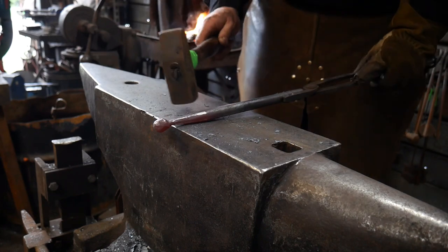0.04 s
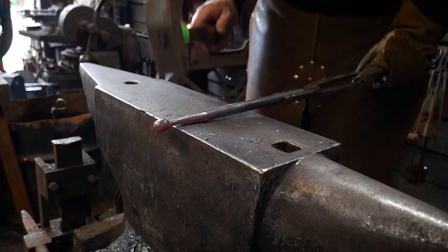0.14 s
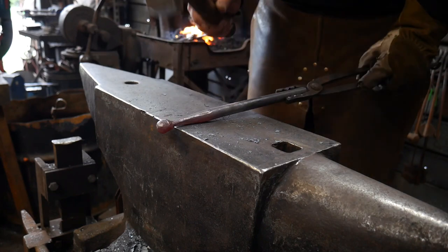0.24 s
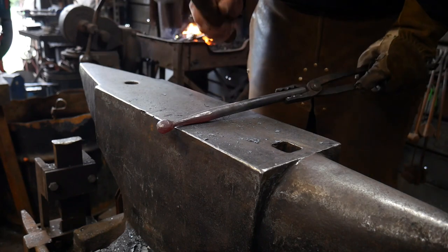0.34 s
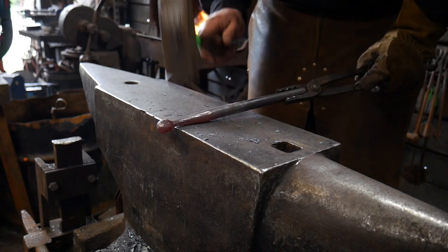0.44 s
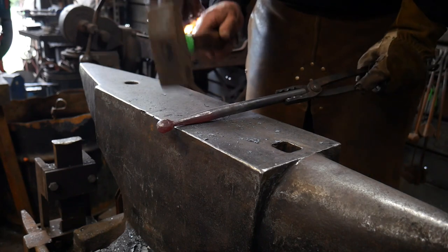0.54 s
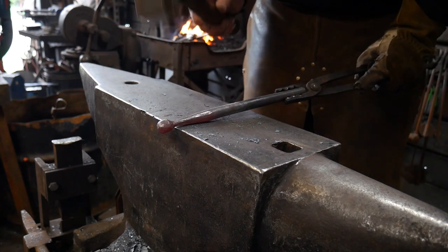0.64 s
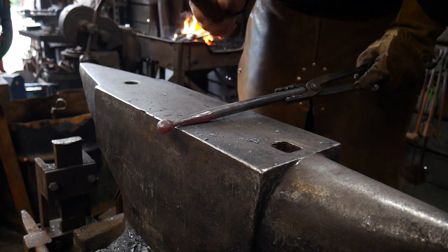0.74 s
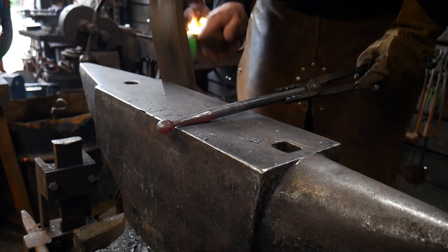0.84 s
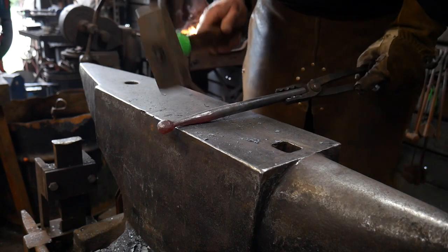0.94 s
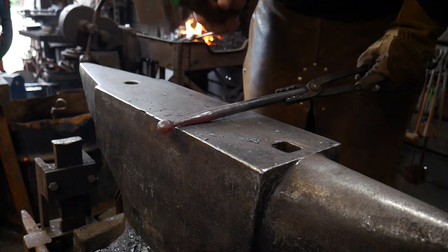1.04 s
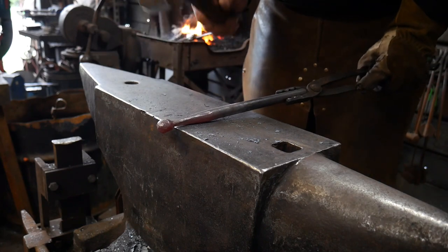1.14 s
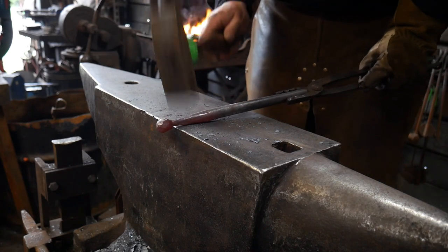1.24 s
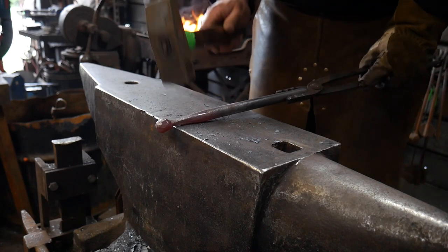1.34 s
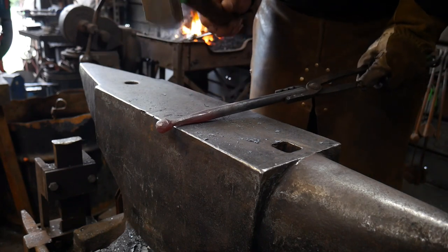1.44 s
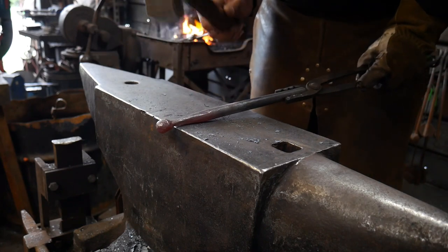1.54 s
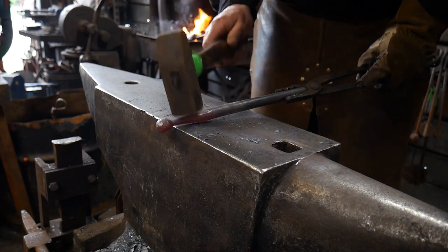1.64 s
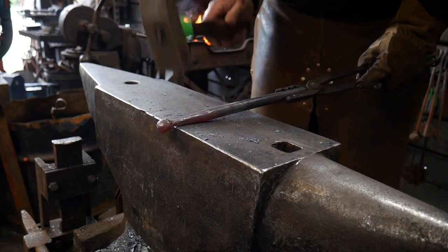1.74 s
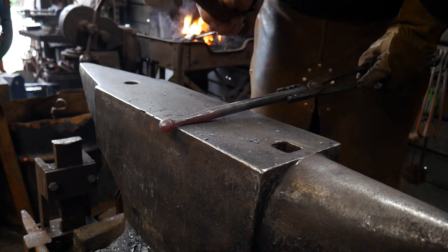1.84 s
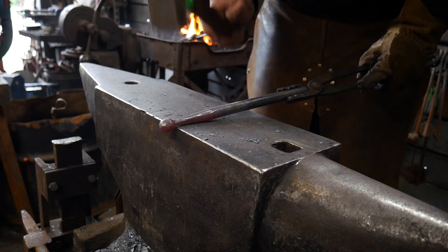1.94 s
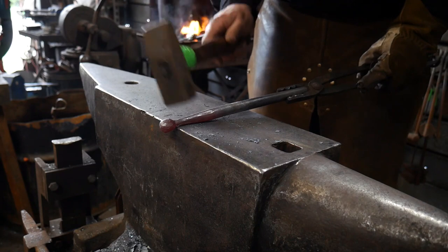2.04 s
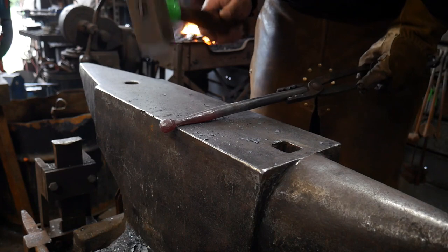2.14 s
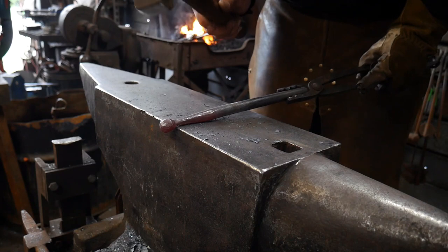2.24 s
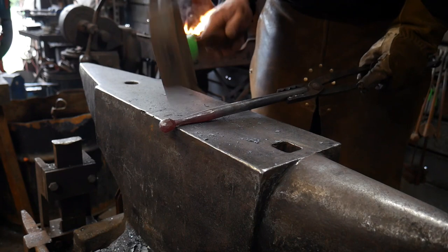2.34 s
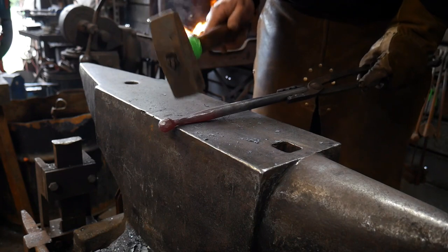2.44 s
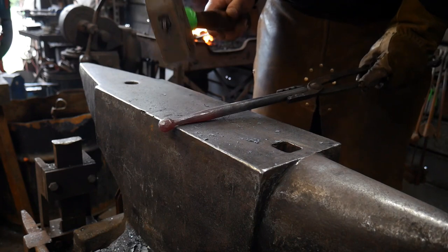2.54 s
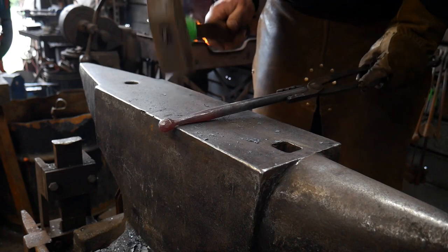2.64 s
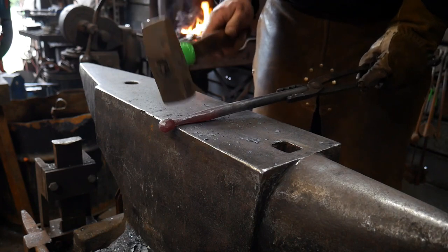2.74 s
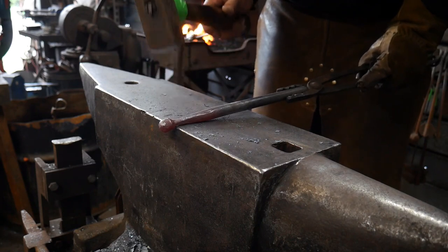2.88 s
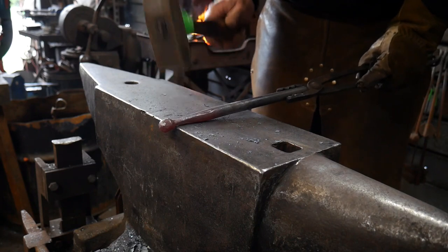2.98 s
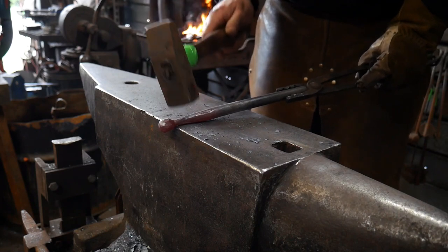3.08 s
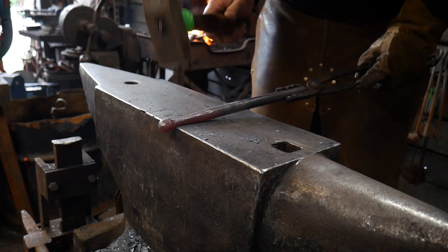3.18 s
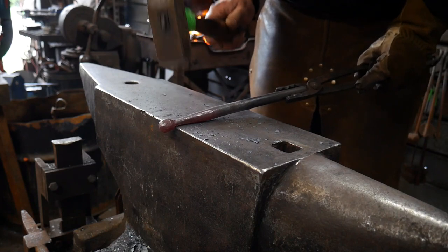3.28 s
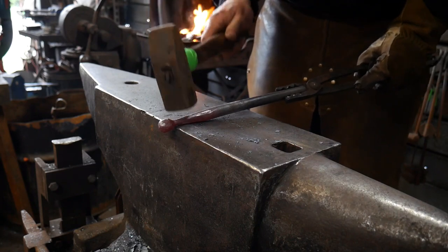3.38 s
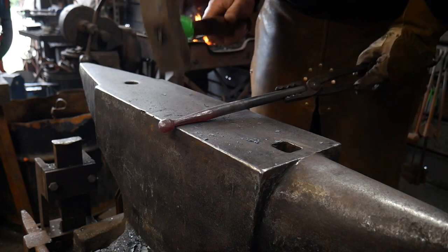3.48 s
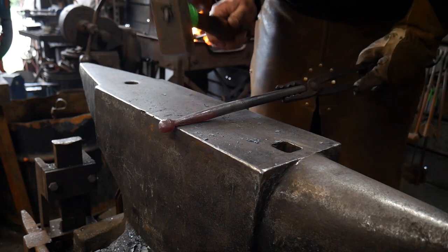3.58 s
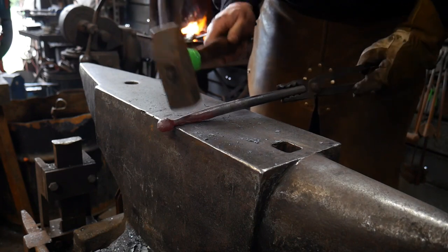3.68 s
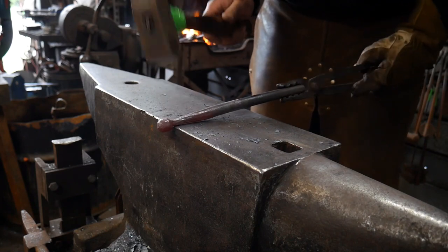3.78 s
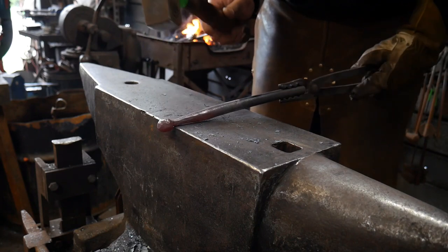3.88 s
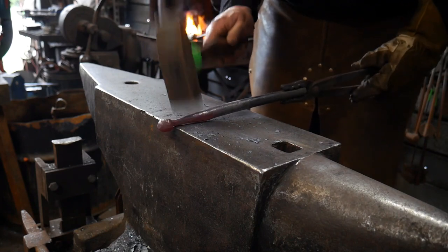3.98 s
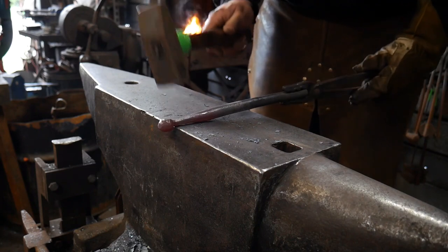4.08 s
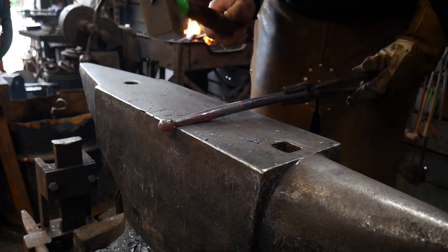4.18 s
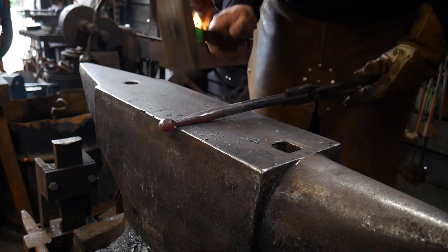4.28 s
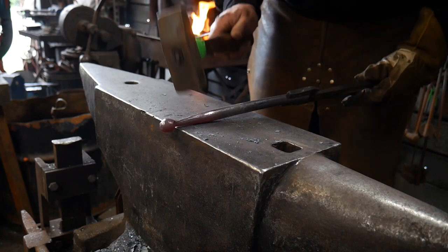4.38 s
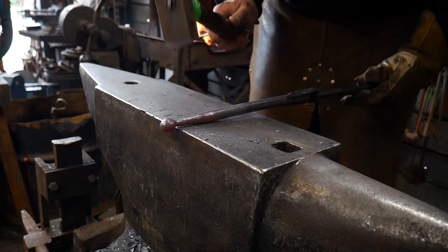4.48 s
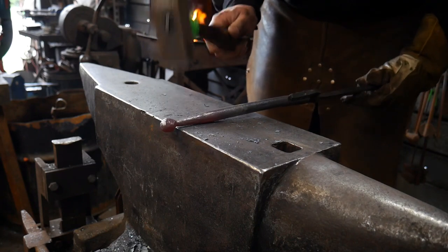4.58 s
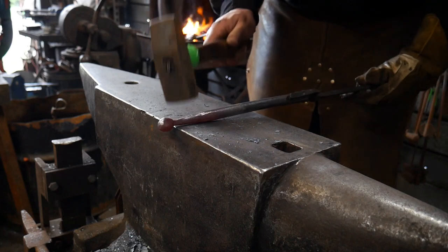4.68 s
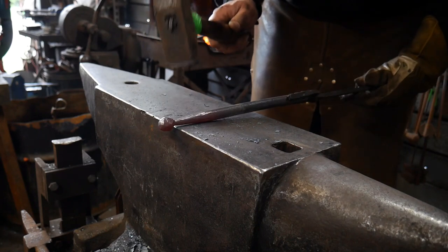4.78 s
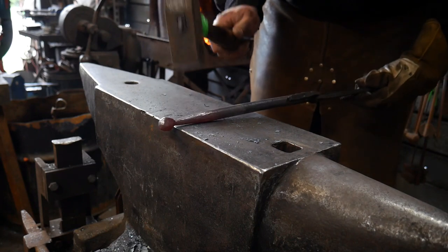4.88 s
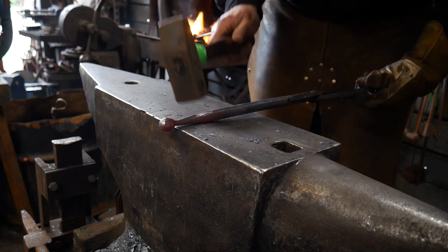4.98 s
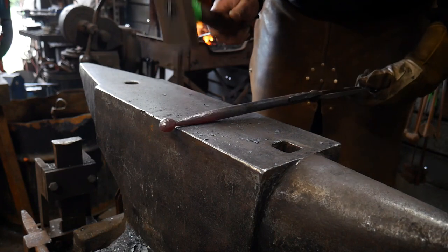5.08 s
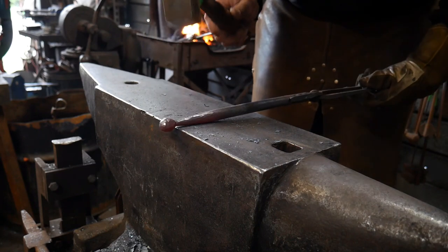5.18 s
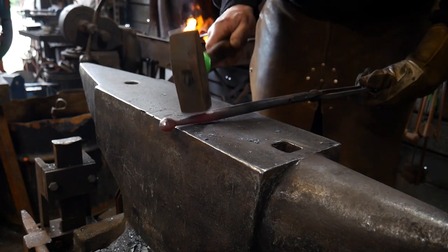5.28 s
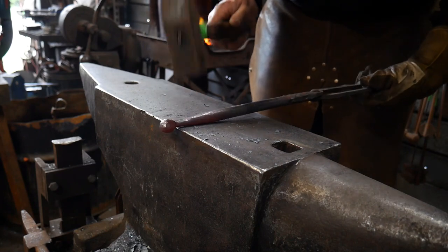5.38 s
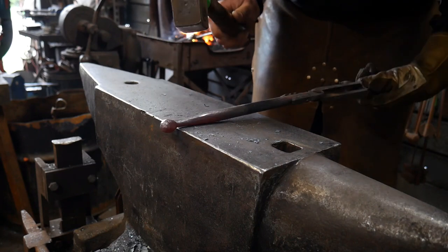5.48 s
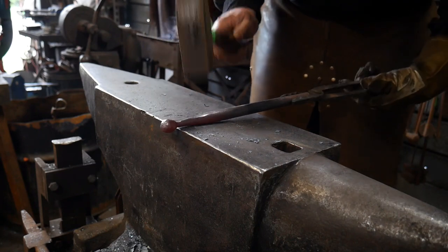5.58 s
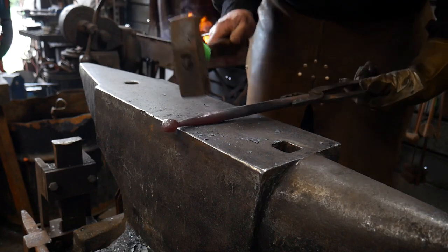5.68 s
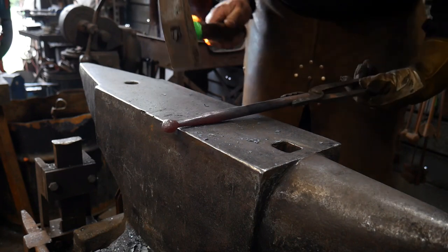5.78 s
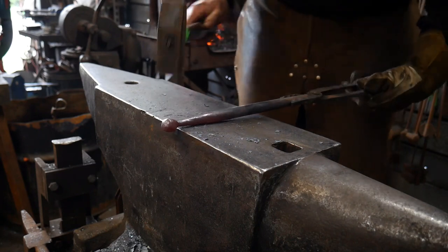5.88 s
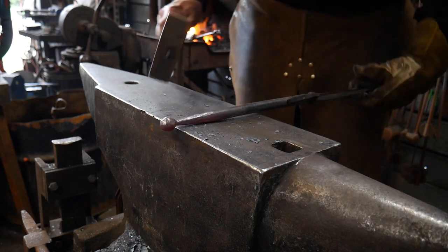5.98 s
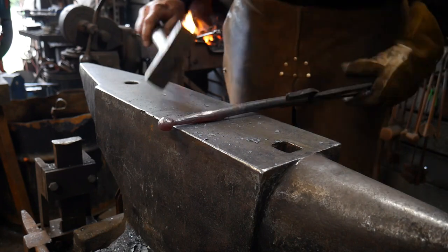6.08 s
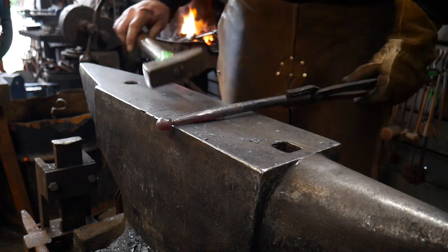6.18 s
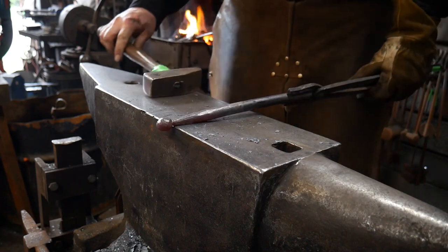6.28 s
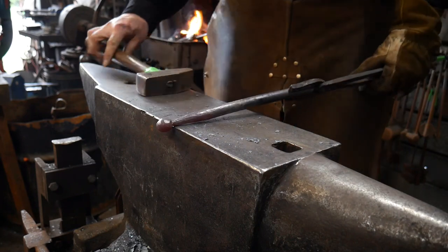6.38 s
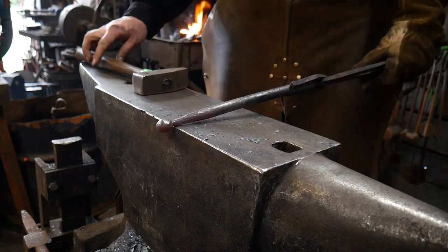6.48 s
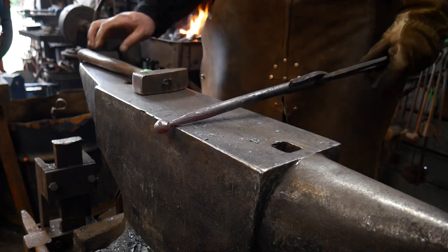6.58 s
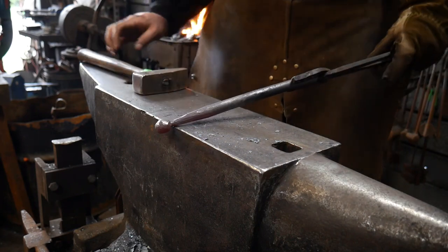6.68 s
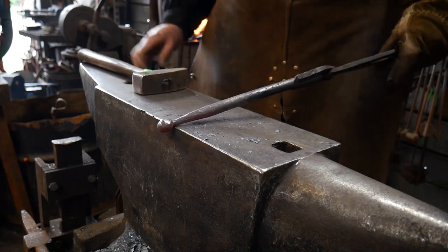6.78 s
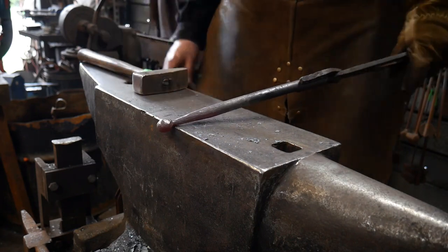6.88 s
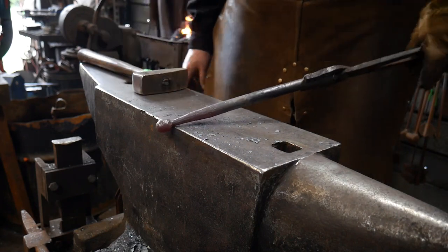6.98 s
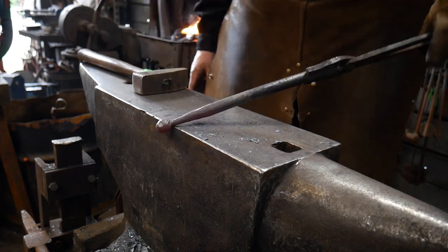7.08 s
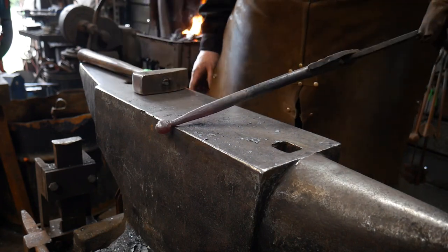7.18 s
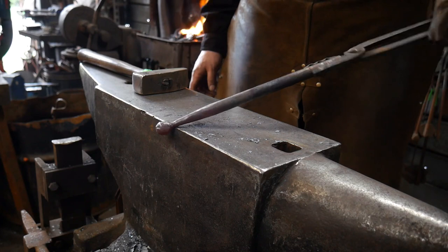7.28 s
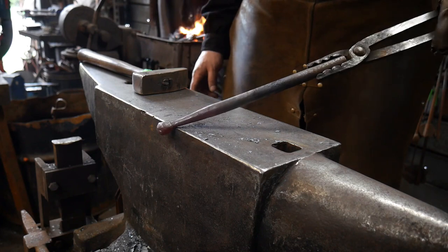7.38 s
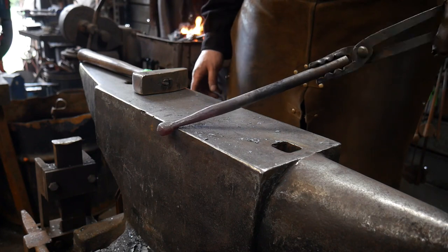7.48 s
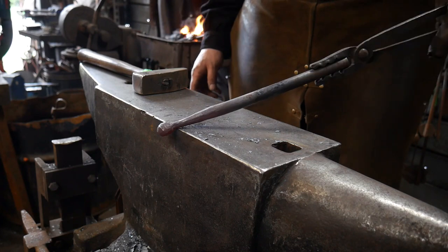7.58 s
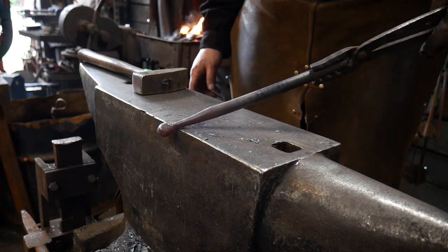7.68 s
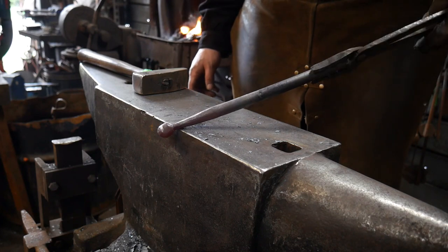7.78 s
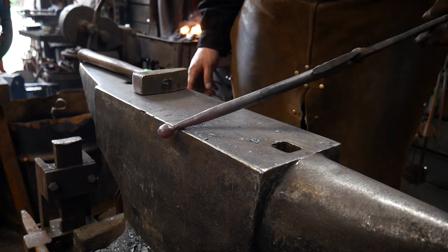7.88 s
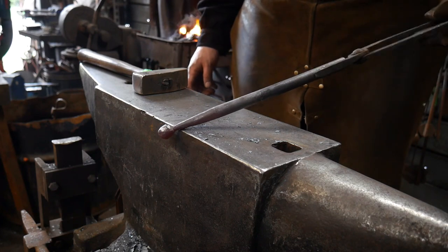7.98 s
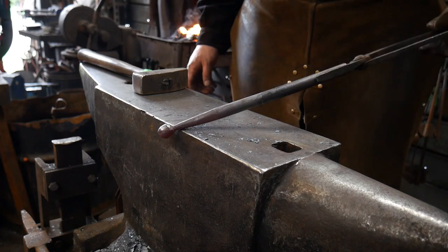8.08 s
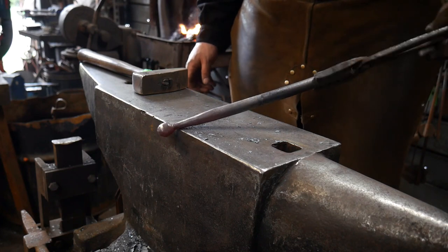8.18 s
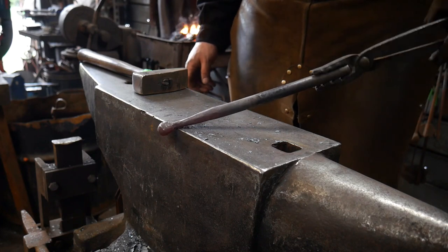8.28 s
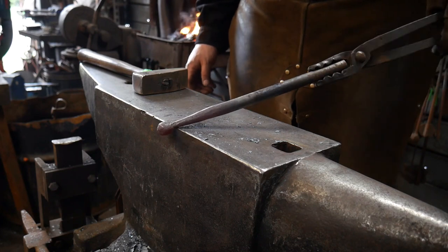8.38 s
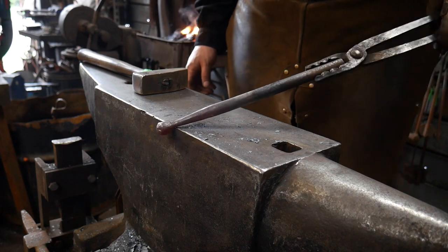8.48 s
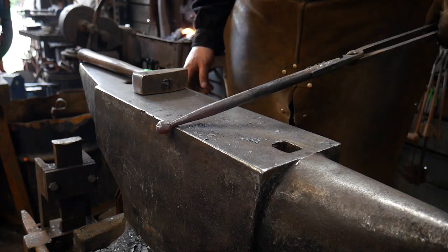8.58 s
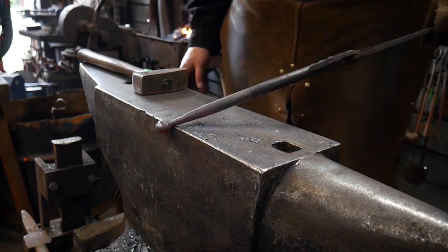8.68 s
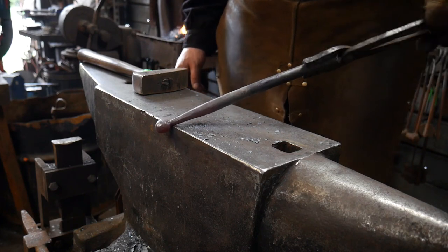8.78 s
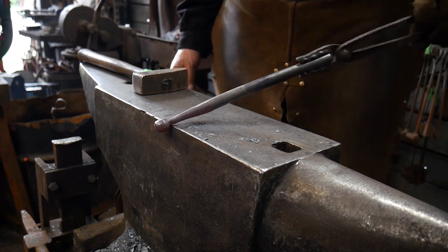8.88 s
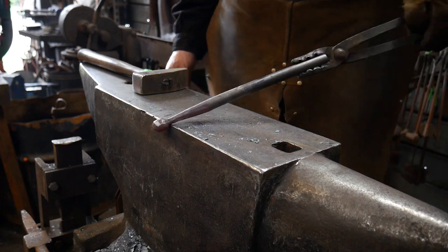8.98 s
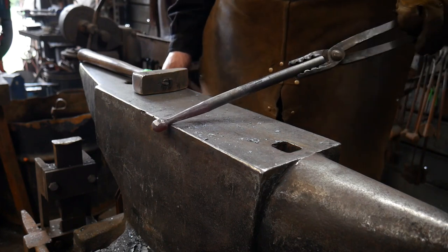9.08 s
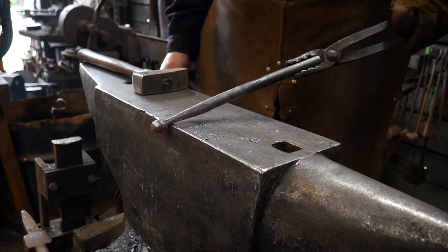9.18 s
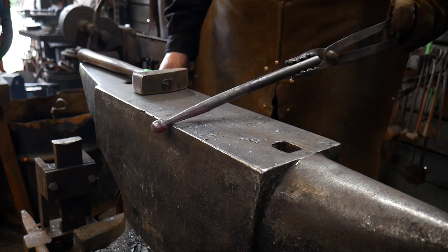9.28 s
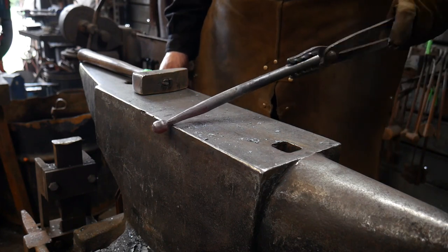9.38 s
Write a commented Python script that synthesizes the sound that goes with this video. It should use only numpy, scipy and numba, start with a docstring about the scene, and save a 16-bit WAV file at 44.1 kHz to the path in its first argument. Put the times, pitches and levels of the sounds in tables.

```python
"""Steel is already ringing from a tap on a bare anvil, over a murmuring forge; sixteen blows on a hot bar follow.
Two taps on the bare face come next, then the hammer is laid down and rocks to rest.
Each blow is a noise crack that excites damped steel modes, echoes in a small workshop and overloads
the close microphone. Apron rubs are grainy noise; a bird outside is gliding sines with a diffuse echo."""
import sys
import numpy as np
from scipy import signal
from scipy.fft import rfft, irfft
from scipy.io import wavfile
from scipy.ndimage import uniform_filter1d
from numba import njit

SR = 44100
rng = np.random.default_rng(int(sys.argv[2]) if len(sys.argv) > 2 else 0)


def dump_mix(stems):
    """Bounce the given channels to the path in sys.argv[1] as a 16-bit WAV at rate SR."""
    frames = np.atleast_2d(stems).T  # one column per channel
    limited = np.clip(frames, -1, 1)  # hard clip at full scale
    pcm = np.round(limited * 32767).astype(np.int16)
    wavfile.write(sys.argv[1], SR, pcm)


N = 415995
RING_TIME_S = np.arange(SR) / SR  # time since a contact
LEAD_S = 0.05  # room for the tap that falls just before time zero
TOP_HZ = 16000

# All table levels are relative; each source adds its own trim.
# Blows on the hot bar; seat_db 0 = bar dead flat on the anvil:
# start_s, force_db, crush_ms, brightness_db, seat_db, face_ring_db
BLOWS = [(0.5677, 0.5, 4.8, -2, -15, 0.5), (0.961, -2.5, 4.6, -1, -21, -1.5),
         (1.3556, -6, 5.8, 0, -27, -4.5), (1.738, -3, 4.7, -4.5, -16.5, -1.5),
         (2.1084, 0.5, 6.1, -6, -10.5, 3), (2.4593, -4.5, 6.4, -1.5, -3.5, -2.5),
         (2.7924, -7, 12.3, -1, -22.5, -11.5), (3.1248, -1.5, 7.5, -7.5, -6, -7),
         (3.4347, -5.5, 4.9, -2.5, -10, -2.5), (3.7502, -7, 7.6, 2.5, -19, -3),
         (4.0851, -6.5, 4.6, 5.5, -29, -4.5), (4.4164, -4.5, 4.4, 1, -2, -2),
         (4.7317, -11.5, 5.1, -0.5, -27.5, -11.5), (5.0361, -4, 4.3, -3, -8, -6.5),
         (5.3694, -0.5, 4.7, -5, -5.5, -5), (5.694, -1.5, 5.4, -2.5, -1.5, -2)]
# Bar springs up and slaps back on the anvil: start_s, force_db
BAR_SLAPS = [(1.387, -19), (2.813, -21), (3.769, -20.5), (4.108, -25.5), (4.755, -23.5), (5.056, -24)]
# Hammer face on bare steel: start_s, force_db, contact_ms
BARE_TAPS = [(-0.02, -1.5, 1.4), (6.0165, 0.5, 2.5), (6.1818, -2.5, 1.15), (6.2932, -9, 3.2),
             (6.317, 4, 0.57)]
# Hammer lying on its side, rocking against the anvil: start_s, force_db, contact_ms
HAMMER_ROCKS = [(0.047, -13.5, 1.3), (6.375, -15.5, 2.6), (6.414, -19.5, 2.9), (6.5218, -1, 2.7),
                (6.566, -13.5, 2.8), (6.587, -17, 3.9), (6.839, -31, 16)]
# Handle and head knocking as the hammer rocks: start_s, pitch_hz, level_db, t60_s
HAMMER_KNOCKS = [(.048, 790, -27, 0.07), (6.293, 765, -31.5, 0.62), (6.519, 1220, -27.5, 0.29),
                 (6.525, 1410, -32, 0.15), (6.564, 1433, -24, 0.21), (6.785, 255, -44, 0.071),
                 (6.839, 3880, -47, 0.11)]

# Anvil flexing as a beam: pitch_hz, level_db, t60_s
ANVIL_BEND_MODES = [(2742, -21, .32), (3614, -26.5, .64), (5050, -27, .3), (7558, -45, .33),
                    (12255, -48, .42)]
# Anvil face and body: pitch_hz, level_db, t60_s
ANVIL_FACE_MODES = [(1143, -40, .35), (1415, -35, .32), (1528, -36, .37), (1682, -36, .29),
                    (2228, -50, .85), (2397, -34, .29), (2814, -35, .31), (3391, -37, .32),
                    (3466, -39, .32), (3773, -43, .33), (4971, -32, .42), (6357, -39, .26),
                    (7321, -47, .33), (9571, -53, .57), (9983, -49, .37), (10179, -51, .61),
                    (12465, -50, .47)]
# Hammer head: pitch_hz, level_db, t60_s
HAMMER_MODES = [(1412, -26, .24), (2530, -33, .22), (3050, -34, .2), (4084, -26, .22), (4093, -21, .25),
                (4269, -37, .25), (4874, -25, .24), (4888, -29, .2), (5052, -26, .2), (5486, -38, .28),
                (6352, -36, .3), (6503, -36, .25), (6896, -37, .25), (7330, -42, .3), (8020, -46, .3),
                (8592, -47, .33), (9152, -42, .33), (11990, -36, .18)]
# Colour of the crack: freq_hz, level_db
CRACK_COLOUR = [(35, -12), (100, -18), (260, -7.5), (480, -9.5), (800, 1), (1050, 0.5), (1600, -1),
                (3800, 1), (4700, -1), (6200, -1.5), (7500, -5), (12000, -7.5), (16000, -14)]
# Colour of the workshop echo: freq_hz, level_db
WALL_COLOUR = [(60, -2.5), (160, 8.5), (330, -2.5), (480, 9.5), (750, -1), (1300, 2), (1900, -3.5),
               (2700, -0.5), (4400, 0), (5900, -3), (8000, 1), (12000, -4), (15500, -9.5)]
# Decay of the workshop echo: freq_hz, t60_s
WALL_DECAY = [(100, 0.82), (500, .38), (1500, 0.36), (4000, 0.3), (8000, 0.27), (15000, .26)]

# Colour of the forge bed: freq_hz, level_db
FORGE_COLOUR = [(20, -11), (40, -4), (68, 2), (100, -6), (160, -4.5), (260, -5), (450, -7), (750, -6.5),
                (1200, -8.5), (1650, -17.5), (2500, -18), (4000, -22.5), (6000, -27.5), (9000, -35),
                (13000, -41), (16000, -52.5)]
# Level of the background bed over time: time_s, level_db
BED_LEVEL = [(0, -3), (5, -6), (6.9, -5), (7.6, -1.5), (9.43, -1.5)]
# Apron and glove rubs, each swelling and fading: peak_s, half_length_s, level_db
APRON_RUBS = [(1.248, 0.29, -56.5), (7.216, 0.061, -56.5), (7.345, .03, -57), (7.558, 0.074, -59),
              (8.285, .03, -51.5), (8.786, 0.083, -59.5), (9.03, 0.13, -53.5), (9.263, 0.039, -53.5)]
# Colour of leather rubbing: freq_hz, level_db
LEATHER_COLOUR = [(300, -19), (2000, 0.0), (4000, -3.5), (6000, -2.5), (7500, -12.5), (12000, -20), (16000, -17)]
# Bird notes: start_s, length_s, start_hz, end_hz, level_db
BIRD_NOTES = [(1.627, 0.1, 3250, 2153, -41), (1.877, 0.056, 2340, 2020, -50),
              (2.303, 0.32, 2624, 2390, -45.5), (2.344, 0.044, 3140, 3110, -45.5),
              (3.014, 0.064, 2384, 3160, -44.5), (3.724, 0.032, 2990, 3070, -48.5),
              (3.918, 0.05, 2890, 2260, -47.5), (6.65, 0.026, 2660, 2393, -41),
              (6.699, 0.068, 2915, 2990, -48.5), (6.756, 0.093, 2646, 2143, -47.5),
              (7.458, 0.091, 2457, 2494, -43), (7.531, 0.088, 2680, 2610, -42.5),
              (7.615, 0.077, 2296, 2497, -42), (8.099, 0.021, 2910, 2660, -40.5),
              (8.139, 0.043, 2910, 2024, -40), (8.231, 0.041, 3110, 3340, -46),
              (8.295, 0.075, 2410, 2030, -46)]

FORGE_DB = -51
# Force is taken off the thud, which therefore hardly changes: softer contacts sound duller.
BLOW_THUD_DB, SLAP_THUD_DB, TAP_THUD_DB, ROCK_THUD_DB = -2, -15.5, -5, -22.5
# A badly seated bar clanks instead of ringing the anvil; hot steel deadens the hammer head.
FLAT_CLANK_DB, CLANK_DB_PER_SEAT_DB, BLOW_HEAD_DB = -2.5, 0.18, -24.5
SLAP_CHATTER_MS, SLAP_BRIGHT_DB, SLAP_CLANK_DB, SLAP_RING_DB = 6, -1, 5, -8
# On bare steel the head rings freely, and even a light tap rings well.
TAP_BRIGHT_DB, TAP_CLANK_DB, TAP_RING_DB_PER_FORCE_DB = -18, 1, 0.6
TAP_BEND_DB, TAP_FACE_DB, TAP_HEAD_DB = -14.5, -2.5, 0
ROCK_BRIGHT_DB, ROCK_CLANK_DB, ROCK_FACE_DB, ROCK_RING_DB = -24.5, 2, -12.5, -13


def undb(db):
    """Decibels to gain."""
    return 10 ** (np.asarray(db) / 20)


def unit(x):
    """Scale to rms 1."""
    return x / np.sqrt(np.mean(x ** 2))


def at_hz(points, hz):
    """Read (Hz, value) points on a log-frequency axis."""
    point_hz, value = np.transpose(points)
    return np.interp(np.log(np.maximum(hz, 1)), np.log(point_hz), value)


def bins(size):
    """Frequencies of a real spectrum, Hz."""
    return np.arange(size // 2 + 1) * SR / size


def hump(hz, centre_hz, octaves):
    """Bell of height 1 on the log-frequency axis."""
    return np.exp(-0.5 * (np.log2(np.maximum(hz, 1) / centre_hz) / octaves) ** 2)


def causal(db, size=2048):
    """Minimum-phase impulse response of a dB curve, through its cepstrum."""
    cepstrum = irfft(np.log(undb(db)))
    cepstrum[1:size // 2] *= 2
    cepstrum[size // 2 + 1:] = 0
    return irfft(np.exp(rfft(cepstrum)))


def noise(colour):
    """Noise of rms 1 with the given colour."""
    spectrum = rfft(rng.standard_normal(N))
    return unit(irfft(spectrum * undb(at_hz(colour, bins(N))), N))


def walk(rate_hz):
    """Smooth random signal: Gaussian steps at rate_hz, averaged twice over one step."""
    step = int(SR / rate_hz)
    steps = np.repeat(rng.standard_normal(N // step + 1), step)
    return uniform_filter1d(uniform_filter1d(steps, step), step)[:N]


def fade(time_s, t60_s):
    """Exponential decay, 60 dB in t60_s."""
    return np.exp(-np.log(1000) * time_s / t60_s)


def add(track, start_s, sound):
    """Mix a sound into a track, clipped to the track's ends."""
    start = int(round(start_s * SR))
    a, b = max(start, 0), min(start + len(sound), len(track))
    track[a:b] += sound[a - start:b - start]


def echoes(t60s, colour, build_s, count=9):
    """Diffuse response of unit energy: octave-spaced bands that each die at their own rate."""
    hz = bins(len(RING_TIME_S))
    spectrum = rfft(rng.standard_normal(len(RING_TIME_S)))
    centres_hz = np.geomspace(60, 16000, count)
    tail = 0
    for centre_hz, share in zip(centres_hz, np.eye(count)):
        gain = at_hz(np.c_[centres_hz, share], hz) * undb(at_hz(colour, hz))
        band = irfft(spectrum * gain, len(RING_TIME_S))
        tail = tail + band * fade(RING_TIME_S, at_hz(t60s, centre_hz))
    tail = tail * (1 - np.exp(-(RING_TIME_S / build_s) ** 2))
    return tail / np.linalg.norm(tail)


def contacts():
    """Every contact in time order: start_s, force, crush_ms, thud, bright, clank, bend, face, head (dB)."""
    rows = []
    for start_s, force, crush_ms, bright, seat, face in BLOWS:
        thud = BLOW_THUD_DB - force
        clank = FLAT_CLANK_DB - CLANK_DB_PER_SEAT_DB * seat
        rows.append((start_s, force, crush_ms, thud, bright, clank, seat, face, BLOW_HEAD_DB + force))
    for start_s, force in BAR_SLAPS:
        thud, rung = SLAP_THUD_DB - force, SLAP_RING_DB + force
        rows.append((start_s, force, SLAP_CHATTER_MS, thud, SLAP_BRIGHT_DB, SLAP_CLANK_DB, rung, rung, rung))
    for start_s, force, contact_ms in BARE_TAPS:
        thud, rung = TAP_THUD_DB - force, TAP_RING_DB_PER_FORCE_DB * force
        rows.append((start_s, force, contact_ms, thud, TAP_BRIGHT_DB, TAP_CLANK_DB,
                     TAP_BEND_DB + rung, TAP_FACE_DB + rung, TAP_HEAD_DB + rung))
    for start_s, force, contact_ms in HAMMER_ROCKS:
        thud, rung = ROCK_THUD_DB - force, ROCK_RING_DB + force
        rows.append((start_s, force, contact_ms, thud, ROCK_BRIGHT_DB, ROCK_CLANK_DB,
                     rung, ROCK_FACE_DB + force, rung))
    return sorted(rows)


def crack(crush_ms, thud_db, bright_db, clank_db, push=0.98, full_push_ms=5.7, push_hz=1900,
          chatter_hz=1500, clank_hz=6050, clank_octaves=0.12, clank_base_db=7, bright_hz=10000, size=2048):
    """A blunt push carries the body; bright chatter lasts as long as the contact; a broad resonance clanks."""
    hz, time_ms = bins(size), RING_TIME_S[:size] * 1000
    weight = np.sqrt(min(crush_ms / full_push_ms, 1))  # a brief contact gives a lighter push
    lowpass = signal.butter(1, push_hz, fs=SR)
    blow = weight * push * signal.lfilter(*lowpass, signal.unit_impulse(size))
    chatter = rng.standard_normal(size) * np.exp(-(time_ms / crush_ms) ** 2)
    highpass = signal.butter(2, chatter_hz, "high", fs=SR)
    chatter = signal.lfilter(*highpass, chatter / np.linalg.norm(chatter))
    colour_db = at_hz(CRACK_COLOUR, hz) + thud_db * hump(hz, 230, 1)
    colour_db = colour_db + bright_db * hump(np.minimum(hz, bright_hz), bright_hz, 0.82)  # flat above bright_hz
    colour_db = colour_db + (clank_base_db + clank_db) * hump(hz, clank_hz, clank_octaves)
    return signal.fftconvolve(blow + chatter, causal(colour_db))


def ring(modes):
    """Damped modes set going by one contact; each level varies randomly per contact, more for higher modes."""
    pitch_hz, level_db, t60_s = np.transpose(modes)[:, :, None]
    time_s = RING_TIME_S[:int(1.2 * t60_s.max() * SR)]
    size = undb(level_db + pitch_hz / 3500 * rng.standard_normal(pitch_hz.shape))
    sign = rng.choice([-1, 1], pitch_hz.shape)
    waves = np.sin(2 * np.pi * pitch_hz * time_s)
    return np.sum(sign * size * fade(time_s, t60_s) * waves, axis=0)


def hammering(crack_db=23.5, bend_db=1, face_db=0, head_db=1, stand_db=-44.0, stand_hz=155, stand_t60_s=0.73,
              room_db=-9.5, ring_room_db=-16, choke=0.87):
    """Cracks, ringing steel and the boom of the anvil's stand, with the workshop's echo."""
    lead = int(LEAD_S * SR)
    cracks, rings = np.zeros((2, lead + N))
    for start_s, force, crush_ms, thud, bright, clank, bend, face, head in contacts():
        s = start_s + LEAD_S
        # the weight of the hammer chokes what still rings from before
        rings[int(s * SR):] *= np.exp(-choke * undb(force))
        add(cracks, s, undb(crack_db + force) * crack(crush_ms, thud, bright, clank))
        add(rings, s, undb(bend_db + bend) * ring(ANVIL_BEND_MODES))
        add(rings, s, undb(face_db + face) * ring(ANVIL_FACE_MODES))
        add(rings, s, undb(head_db + head) * ring(HAMMER_MODES))
        add(rings, s, ring([(stand_hz, stand_db + force + thud / 2, stand_t60_s)]))
    for start_s, *mode in HAMMER_KNOCKS:
        add(rings, start_s + LEAD_S, ring([mode]))
    room = echoes(WALL_DECAY, WALL_COLOUR, build_s=0.0039)
    sent = undb(room_db) * cracks + undb(ring_room_db) * rings
    echo = signal.fftconvolve(sent, room)[:lead + N]
    return (cracks + rings + echo)[lead:]


def forge(flutter_db=1, hum_hz=356.0, hum_db=-65, hum_from_s=6.9):
    """The fire's fluttering roar as coloured noise; a faint sine hum sets in once the hammer is down."""
    time_s = np.arange(N) / SR
    bed_db = np.interp(time_s, *np.transpose(BED_LEVEL))
    roar = noise(FORGE_COLOUR) * undb(FORGE_DB + bed_db + flutter_db * walk(11))
    pitch_hz = hum_hz * (1 + 0.0011 * walk(6.7))
    hum = np.sqrt(2) * np.sin(2 * np.pi * np.cumsum(pitch_hz) / SR)
    onset = np.clip((time_s - hum_from_s) / 0.16, 0, 1)
    return roar + hum * undb(hum_db + 0.82 * walk(10)) * onset


def apron(rustle_db=-2, grain_db=2.0):
    """Leather and glove rub in fine uneven grains while the bar is turned over."""
    time_s = np.arange(N) / SR
    effort = np.zeros(N)
    for peak_s, half_s, level_db in APRON_RUBS:
        effort += undb(level_db + rustle_db) * np.exp(-((time_s - peak_s) / half_s) ** 2)
    return effort * noise(LEATHER_COLOUR) * undb(grain_db * walk(150))


def bird(direct_db=-9, echo_db=-0.5, yard_t60_s=0.53, waver=0.035):
    """Slurred, wavering whistles from outside, smeared by a diffuse echo."""
    song, wobble = np.zeros(N), walk(260)
    for start_s, length_s, start_hz, end_hz, level_db in BIRD_NOTES:
        u = np.linspace(0, 1, int(length_s * SR))
        glide_hz = start_hz + (end_hz - start_hz) * u
        pitch_hz = glide_hz * (1 + waver * wobble[int(start_s * SR):][:len(u)])
        swell = np.sqrt(8 * u * (1 - u))
        add(song, start_s, undb(level_db) * swell * np.sin(2 * np.pi * np.cumsum(pitch_hz) / SR))
    yard = echoes([(1000, yard_t60_s)], [(1000, 0)], build_s=0.0071)
    return undb(direct_db) * song + undb(echo_db) * signal.fftconvolve(song, yard)[:N]


def scene(noise_side_db=-77, width_db=-32, size=256):
    """Sum of all sources; a faint noise-filtered copy and faint noise, opposite in the channels, add slight width."""
    mid = hammering() + forge() + apron() + bird()
    noise_filter = rng.standard_normal(size) / np.sqrt(size)
    side = undb(width_db) * signal.fftconvolve(mid, noise_filter)[:N]
    side = side + undb(noise_side_db) * noise(FORGE_COLOUR)
    return np.array([mid + side, mid - side])


@njit
def hold(over_db, keep):
    """Jump up with each peak, then sink back slowly."""
    out, level = np.empty(len(over_db)), 0.
    for i in range(len(over_db)):
        level = max(over_db[i], level * keep + 1e-18)
        out[i] = level
    return out


def record(dry, ceiling_db=5, release_s=0.07, size=45):
    """A limiter ducks the cracks and lets the ring swell back; tanh flattens what it passes; the top is cut."""
    peak_db = 20 * np.log10(np.abs(dry).max(axis=0) + 1e-9)
    duck_db = hold(np.maximum(peak_db - ceiling_db, 0), np.exp(-1 / (release_s * SR)))
    limited = np.tanh(dry * undb(-uniform_filter1d(duck_db, size)))
    top_cut = signal.ellip(8, 0.2, 70, TOP_HZ, fs=SR, output="sos")
    return signal.sosfilt(top_cut, limited)


dry = scene()
out = record(dry)
dump_mix(out)
```